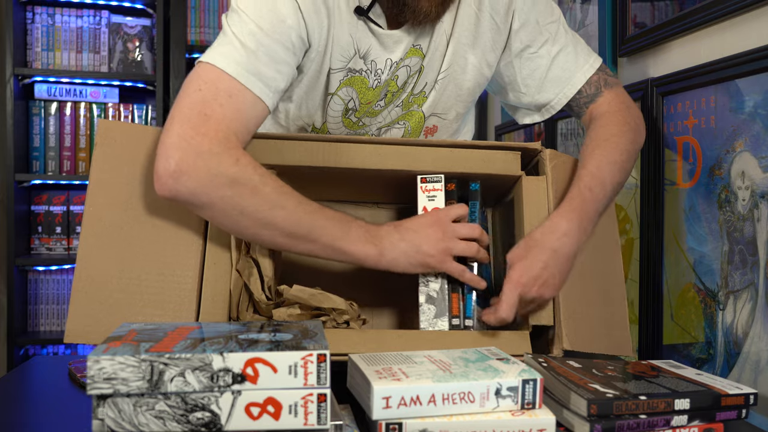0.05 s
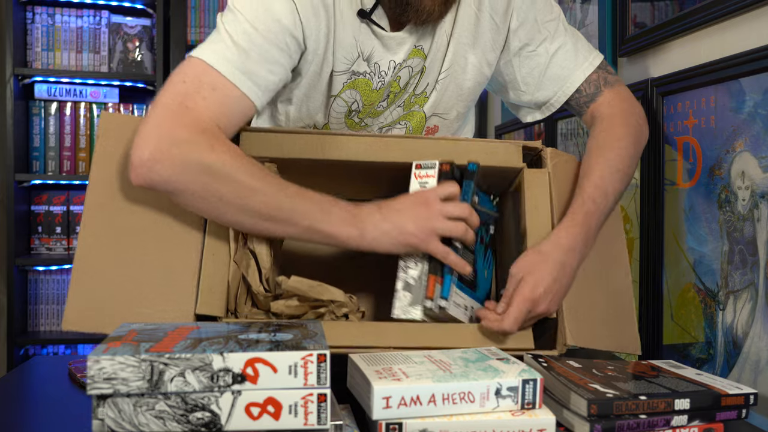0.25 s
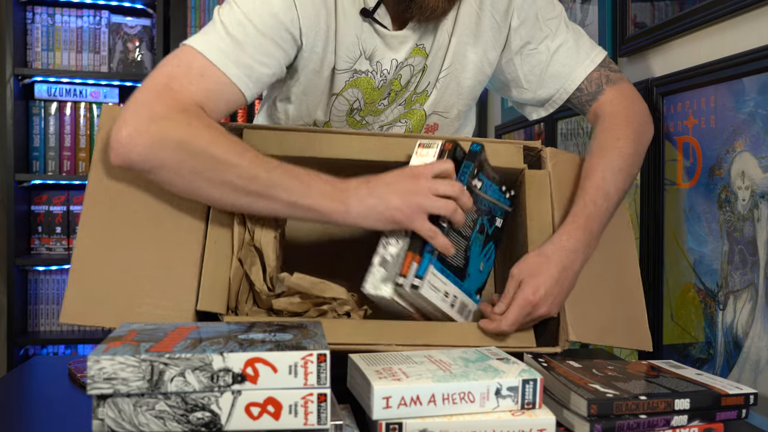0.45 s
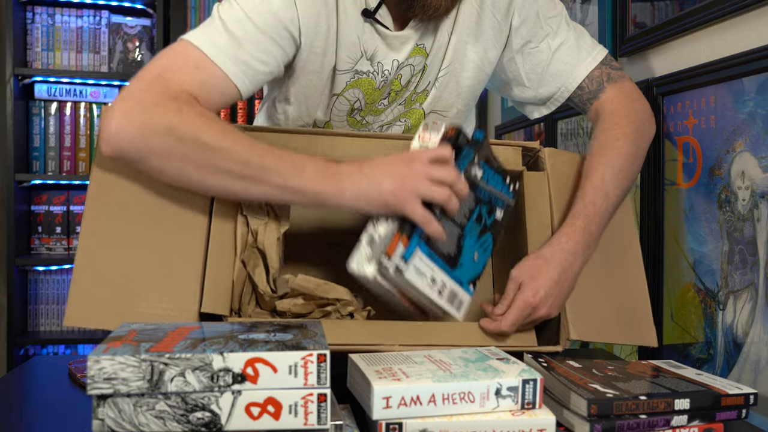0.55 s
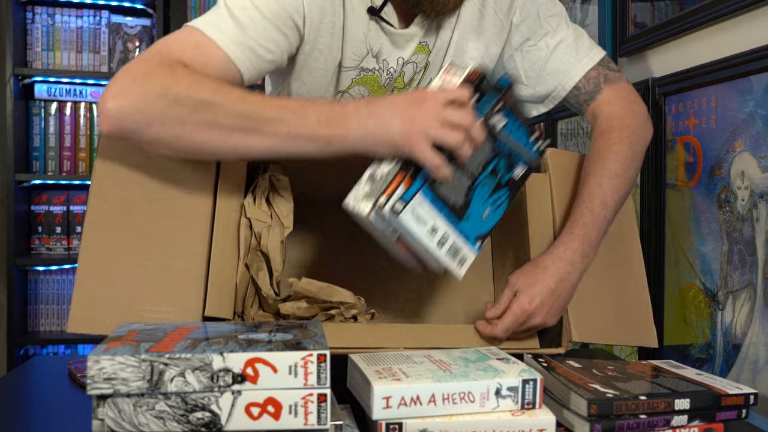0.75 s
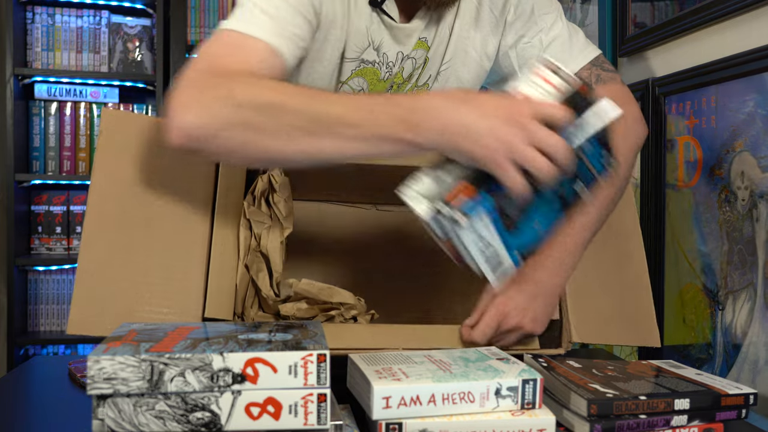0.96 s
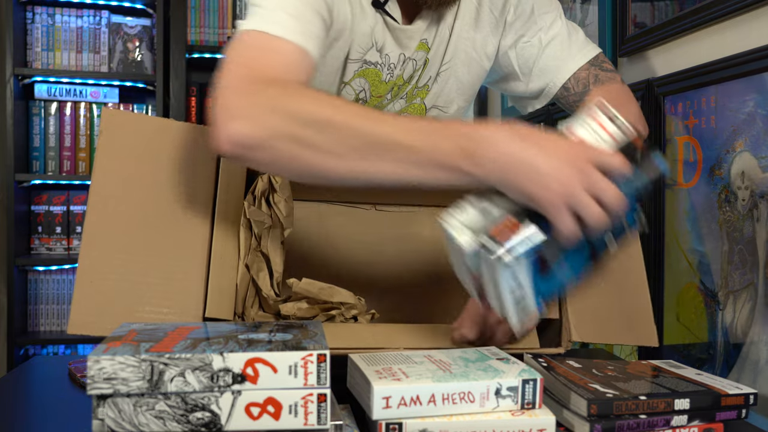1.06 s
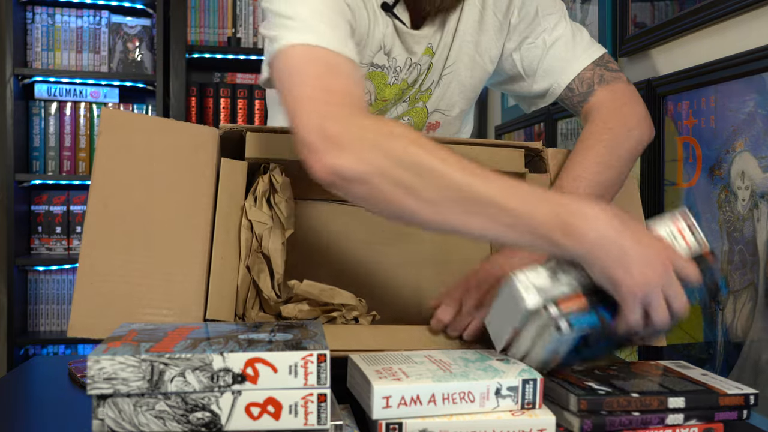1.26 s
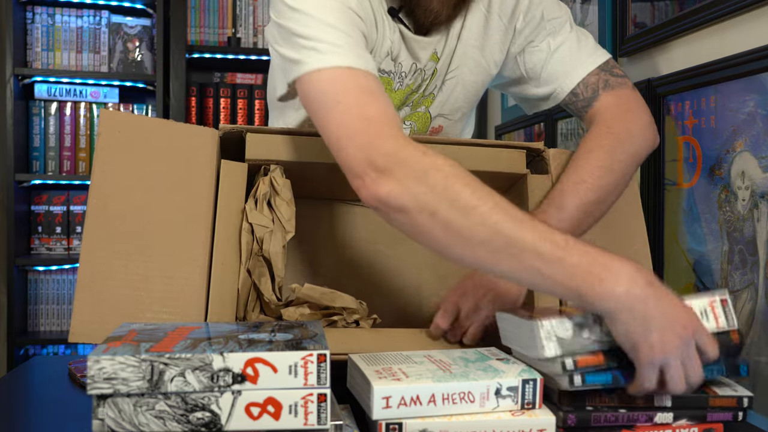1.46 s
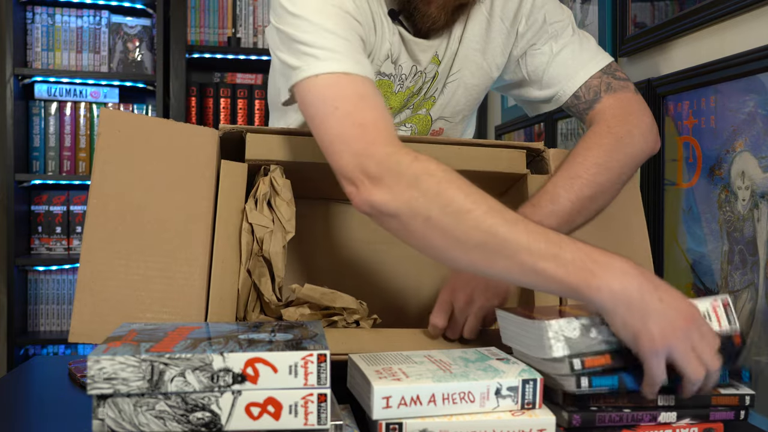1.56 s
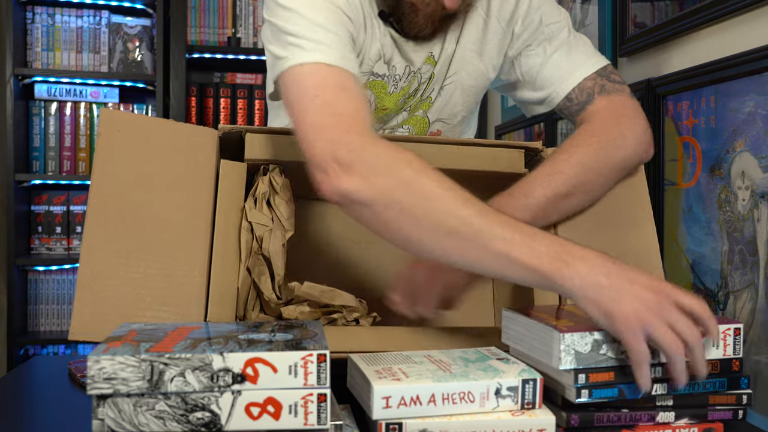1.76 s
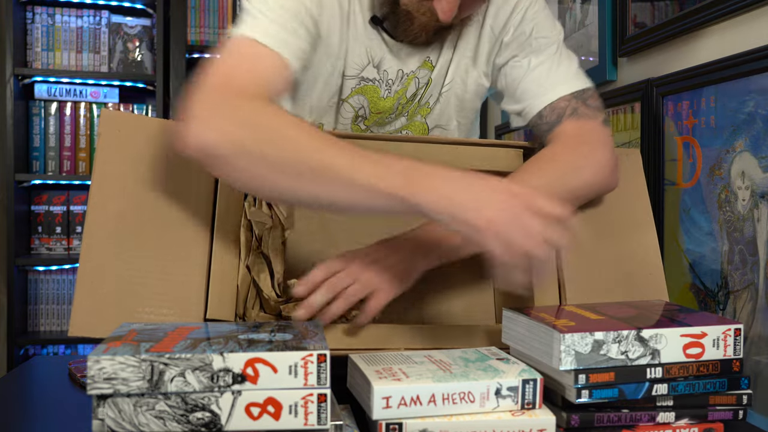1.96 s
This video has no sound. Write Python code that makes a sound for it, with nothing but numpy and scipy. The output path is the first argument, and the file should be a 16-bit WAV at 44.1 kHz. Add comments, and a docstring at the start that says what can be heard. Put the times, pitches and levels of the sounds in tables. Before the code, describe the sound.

Close up in a small, quiet room, books are dragged out of a cardboard box with a rasp and hollow knocks. After a light rustle, they settle on a pile with a bump and a dull thump.

```python
"""First comes a faint rustle and a soft bump, close by in a small, quietly rumbling room.
A handful of books is dragged out of a cardboard box: the covers hiss along the cardboard,
bump the wall and judder over the rim, which makes the box ring. Covers and sleeves rustle
as the books are carried to a pile on the table. They land with a soft bump, the tick of a
cover snapping flat and a dull thump. Rubbing is shaped noise; bumps set fading tones ringing."""
import sys
import numpy as np
from scipy import signal
from scipy.fft import rfft, irfft
from scipy.io import wavfile

SR = 44100
rng = np.random.default_rng(int(sys.argv[2]) if len(sys.argv) > 2 else 0)


def inscribe(sig):
    """Save sig as 16-bit PCM at rate SR to the path in sys.argv[1].

    A 1-D sig is mono; a 2-D sig holds one channel per row.
    Samples are clipped to [-1, 1] before scaling.
    """
    pcm = np.round(np.clip(np.atleast_2d(sig).T, -1, 1) * 32767)
    wavfile.write(sys.argv[1], SR, pcm.astype(np.int16))


N = 88200
TIME = np.arange(N) / SR

# the room's rumble; a "colour" says how strong each pitch is next to the others: f/Hz, level/dB
RUMBLE_COLOUR = [(22, -31), (52, 1.5), (75, -15), (110, 1.5), (200, -3), (320, -9.5), (1000, -16.5),
                 (3500, -27), (15500, -27)]
# stereo width, the side signal compared with the middle one: f/Hz, level/dB
STEREO_WIDTH = [(100, -23), (250, -20), (500, -9.5), (1000, -6), (2000, -4.5), (4000, -0.6), (12000, -2.5)]
# loudness of rustling cloth and covers: t/s, level/dB
RUSTLE_LEVEL = [(0, -64.5), (.70, -65), (.78, -58.5), (.85, -61.5), (.90, -60.5), (.97, -62.5),
                (1.01, -63.5), (1.07, -61.5), (1.10, -64), (1.15, -58), (1.21, -63), (1.27, -58),
                (1.36, -74.5), (1.46, -72.5), (1.63, -71.5), (1.72, -69.5), (1.78, -69), (1.90, -100)]
# colour of that rustle: f/Hz, level/dB
RUSTLE_COLOUR = [(70, -19), (170, 2.5), (520, 2), (750, -1.5), (2500, -3), (3300, -4.5), (4000, -9.5),
                 (5500, -13.5), (8000, -13.5), (15500, -23.5)]
# sleeve swishes; "fade" is the time to drop by 60 dB: t/s, level/dB, rise/s, fade/s
SLEEVE_SWISHES = [(.005, -71, 0.06, 0.17), (.962, -63, 0.22, 0.23), (1.016, -61, .02, 0.2),
                  (1.065, -67, 0.053, .25), (1.16, -68, 0.068, 0.57), (1.265, -65, 0.34, 0.32),
                  (1.40, -70.5, 0.041, .8), (1.71, -71, 0.21, 0.77)]
# colour of the sleeves: f/Hz, level/dB
SLEEVE_COLOUR = [(1500, -30), (2600, -1), (3350, 2.5), (4000, -1), (5000, 1.5), (5700, -3), (8000, 0),
                 (12000, -4), (15500, -7)]
# bumps against the box: t/s, level/dB, contact/ms
BOX_KNOCKS = [(.002, -58, 1.9), (.118, -50, 1.9), (.199, -46, 2.3), (.239, -56, 3.9), (.404, -50, 1.5),
              (.453, -39, 4.7), (.465, -46, 2.4), (.5635, -31.5, 2.53), (.5695, -32, 2.6), (.683, -35, 7.0),
              (.709, -38, 8.4), (.715, -33.5, 3), (.726, -39, 5.5), (.886, -56.5, 1.1)]
# tones the box rings with: f/Hz, level/dB, fade/s
BOX_TONES = [(99.6, -15, .22), (155, -7.5, 0.11), (181.4, -1, .11), (250, -5.5, 0.056), (332, -5, 0.068),
             (355.5, -7, 0.087), (395, -9, 0.082), (450, -11.5, 0.064), (526.7, -7.5, 0.17),
             (613, -12.5, 0.11), (658, -13, 0.057), (1046, -6.5, 0.039), (1160, -6.5, .04),
             (1670, -13, 0.022), (2405, -19, 0.032)]
# loudness of the judder as the books catch and slip on the rim: t/s, level/dB
JUDDER_LEVEL = [(.30, -100), (.42, -60.5), (.47, -54.5), (.51, -59), (.555, -49.5), (.595, -41),
                (.635, -48), (.67, -45), (.70, -46.5), (.722, -47.5), (.738, -59), (.79, -110)]
# brief rubs of cover on cover: t/s, level/dB, rise/s, fade/s
COVER_RUBS = [(0.032, -60, 0.0032, 0.079), (.888, -59, .025, 0.16), (1.236, -54, 0.03, 0.2),
              (1.315, -58, 0.033, 0.3), (1.509, -62, 0.066, 0.06), (1.533, -54.5, 0.016, 0.14),
              (1.684, -58, 0.035, 0.31), (1.99, -71, 0.27, .4)]
# colour of those rubs: f/Hz, level/dB
COVER_RUB_COLOUR = [(100, -43), (300, 5), (750, 4), (1050, -1.5), (1450, 2.5), (2500, -5.5), (3800, -11.5),
                    (9000, -18), (15500, -27)]
# the rasp on cardboard follows the pressure and speed of the slide: t/s, level/dB
RASP_LEVEL = [(.088, -100), (.099, -58), (.125, -56), (.16, -59.5), (.22, -54), (.29, -52), (.38, -51),
              (.46, -47.5), (.52, -50), (.555, -48.5), (.585, -45.5), (.64, -47), (.715, -48), (.74, -52.5),
              (.77, -69.5), (.86, -110)]
# colour of the rasp: f/Hz, level/dB
RASP_COLOUR = [(60, -33), (190, 2), (430, 0.5), (750, -1.5), (1250, -0.5), (2200, -1.5), (3250, -0.5),
               (3700, -8), (5800, -14.5), (8000, -15), (15500, -27)]
# the fine hiss of glossy covers follows the sliding speed: t/s, level/dB
GLOSS_LEVEL = [(.085, -100), (.115, -63), (.165, -63.5), (.21, -59.5), (.32, -57.5), (.46, -54), (.56, -56),
               (.63, -64), (.668, -55), (.695, -60), (.72, -57.5), (.79, -110)]
# colour of that hiss: f/Hz, level/dB
GLOSS_COLOUR = [(2500, -25), (4500, -3), (6000, -8), (7200, -1.5), (8300, -1.5), (9200, -6.5), (12000, -9),
                (15500, -18)]
# echoes off the walls of the box: left delay/ms, right delay/ms, level/dB
BOX_ECHOES = [(1.9, 1.92, -15.5), (3.7, 3.66, -13.5), (6.1, 6.14, -14.5), (9.4, 9.35, -13),
              (14.3, 14.35, -11)]
# loudness of a corner scuffing over the pile: t/s, level/dB
SCUFF_LEVEL = [(1.02, -100), (1.15, -62.5), (1.205, -67), (1.232, -54), (1.275, -58.5), (1.305, -55),
               (1.33, -57), (1.385, -110)]
# the books come down on the pile: t/s, level/dB, contact/ms
PILE_KNOCKS = [(1.2855, -42.5, 2.5), (1.2925, -37.5, 1.58), (1.305, -56.5, 1.3), (1.399, -53, 3.5),
               (1.467, -52, 2.1), (1.522, -51, 4.6), (1.559, -54, 8.1), (1.604, -57.5, 2.5),
               (1.6742, -33, 1.27), (1.680, -41.5, 1.6)]
# tones the pile rings with: f/Hz, level/dB, fade/s
PILE_TONES = [(52.3, -24, 0.53), (102.7, -7.5, 0.13), (130.5, -12.5, 0.14), (160.3, -6, 0.23),
              (217, -10, 0.095), (332.4, -1.5, 0.056), (405, -5, 0.073), (443, -6.5, 0.051),
              (579, -2, 0.032), (860, -11.5, 0.055)]
# a cover snaps flat: t/s, level/dB
COVER_SNAPS = [(1.5222, -42.5), (1.523, -50.5), (1.535, -69)]
# tones the cover rings with: f/Hz, level/dB, fade/s
COVER_TONES = [(1510, -7.5, 0.011), (2000, -3, 0.008), (2620, -3.5, 0.0023), (9700, -9.5, 0.0022),
               (14000, -10, .0015)]

BOX_LOW_HZ, PILE_LOW_HZ, COVER_LOW_HZ = 61, 62.3, 700   # below this each gives off little sound
ROOM_FADE_S, ROOM_DELAY_S = 0.26, 0.0035


def from_db(db):
    """Turn decibels into a number to multiply by."""
    return 10 ** (np.asarray(db) / 20)


def level(curve):
    """Loudness through time, joining the points of a table."""
    return from_db(np.interp(TIME, *np.transpose(curve)))


def strokes(rows):
    """Loudness of brief strokes: each gains its last 20 dB over the rise time, then dies away."""
    return sum(from_db(db - 20 * np.maximum(t - TIME, 0) / rise - 60 * np.maximum(TIME - t, 0) / fade)
               for t, db, rise, fade in rows)


def unit_level(x):
    """Scale a sound to an average strength (rms) of 1."""
    return x / np.sqrt(np.mean(x ** 2) + 1e-20)


def pan(x, db):
    """Make the left side louder than the right by db; below zero leans right."""
    return x * from_db(np.array([[db], [-db]]) / 2)


def high_pass(x, hz):
    """Remove the lows."""
    return signal.sosfilt(signal.butter(2, hz, "high", fs=SR, output="sos"), x)


def coloured(x, colour):
    """Turn each pitch of a sound up or down as a colour table says."""
    hz, db = np.transpose(colour)
    bin_hz = np.maximum(np.fft.rfftfreq(N, 1 / SR), 1)
    return irfft(rfft(x) * from_db(np.interp(np.log(bin_hz), np.log(hz), db)), N)


def stereo(middle, side):
    """Stereo from two unrelated signals: narrow in the bass, wide in the treble."""
    side = coloured(side, STEREO_WIDTH)
    return np.array([middle + side, middle - side])


def grains(per_s, uneven_db):
    """Countless tiny clicks of fibres catching; uneven_db varies their size."""
    sizes = from_db(uneven_db * np.minimum(rng.exponential(1, N), 5)) * rng.choice([-1, 1], N)
    return unit_level(sizes * (rng.random(N) < per_s / SR))


def friction(colour, per_s, uneven_db, pan_db):
    """The tiny clicks blur into a steady stereo rubbing noise."""
    clicks = stereo(grains(per_s, uneven_db), grains(per_s, uneven_db))
    return pan(unit_level(coloured(clicks, colour)), pan_db)


def pushes(rows):
    """A smooth push for each soft contact; the longer it lasts, the duller it sounds."""
    force = np.zeros(N)
    for t, db, ms in rows:
        push = np.sin(np.pi * np.clip((TIME - t) / (ms / 1000), 0, 1)) ** 2
        force += from_db(db) * push / (push.sum() + 1e-9)
    return force


def ring(force, tones, low_hz):
    """A force sets an object's fading tones ringing, neighbours in opposite directions."""
    out = np.zeros(N)
    for k, (hz, db, fade) in enumerate(tones):
        shrink, turn = from_db(-60 / (fade * SR)), 2 * np.pi * hz / SR   # per sample
        feedback = [1, -2 * shrink * np.cos(turn), shrink * shrink]
        out += (-1) ** k * from_db(db) * signal.lfilter([0, np.sin(turn)], feedback, force + 1e-18)
    return high_pass(out, low_hz)


def in_room(x, echo_db):
    """The sound itself plus a short wash of echoes from the room."""
    tail = stereo(*rng.standard_normal((2, N)))
    tail *= from_db(-60 * TIME / ROOM_FADE_S) * (TIME > ROOM_DELAY_S)
    tail /= np.sqrt(np.sum(tail ** 2) / 2)
    return x + from_db(echo_db) * signal.fftconvolve(x[None], tail, axes=1)[:, :N]


def in_box(x):
    """Quick echoes off the cardboard walls make a steady noise sound hollow."""
    out = x.copy()
    for left_ms, right_ms, db in BOX_ECHOES:
        for channel, ms in enumerate((left_ms, right_ms)):
            out[channel] += from_db(db) * np.roll(x[channel], int(ms * SR / 1000))
    return unit_level(out)


def room_rumble(db=-68.5):
    """A quiet, low noise fills the room throughout."""
    noise = stereo(*rng.standard_normal((2, N)))
    return from_db(db) * unit_level(coloured(noise, RUMBLE_COLOUR))


def rustle():
    """Covers rustle and sleeves swish as the arm moves."""
    covers = friction(RUSTLE_COLOUR, per_s=6000, uneven_db=1, pan_db=-1.5)
    sleeves = friction(SLEEVE_COLOUR, per_s=7600, uneven_db=2, pan_db=-4)
    return level(RUSTLE_LEVEL) * covers + strokes(SLEEVE_SWISHES) * sleeves


def box_bumps_and_judder(slips_per_s=160, jitter=0.3, uneven_db=1, grit=0.34):
    """Bumps on the wall and uneven, gritty slips on the rim make the box ring."""
    times = np.cumsum(np.exp(jitter * rng.standard_normal(800)) / slips_per_s)
    times = times[times < TIME[-1]]
    slips = np.zeros(N)
    slips[(times * SR).astype(int)] = from_db(uneven_db * rng.standard_normal(len(times)))
    drag = unit_level(slips) + grit * rng.standard_normal(N)
    drag = high_pass(drag, hz=254)   # slips are too light to stir the lowest tones much
    drag *= level(JUDDER_LEVEL) / np.std(ring(drag, BOX_TONES, BOX_LOW_HZ))
    ringing = ring(drag + pushes(BOX_KNOCKS), BOX_TONES, BOX_LOW_HZ)
    return pan(in_room(ringing, echo_db=-6), db=-0.3)


def cover_rubs():
    """Covers brush each other as the books shift and settle."""
    return strokes(COVER_RUBS) * friction(COVER_RUB_COLOUR, per_s=4500, uneven_db=2.5, pan_db=-3)


def slide():
    """Covers rasp and hiss along the cardboard inside the box."""
    rasp = in_box(friction(RASP_COLOUR, per_s=9000, uneven_db=0, pan_db=-2))
    hiss = in_box(friction(GLOSS_COLOUR, per_s=11000, uneven_db=1.5, pan_db=-3.5))
    return level(RASP_LEVEL) * rasp + level(GLOSS_LEVEL) * hiss


def landing():
    """One corner scuffs and bumps on the pile, then the books drop flat."""
    drag = high_pass(grains(per_s=2100, uneven_db=2), hz=170)   # too light to move the whole pile
    drag *= level(SCUFF_LEVEL) / np.std(ring(drag, PILE_TONES, PILE_LOW_HZ))
    ringing = ring(drag + pushes(PILE_KNOCKS), PILE_TONES, PILE_LOW_HZ)
    return pan(in_room(ringing, echo_db=-8), db=0.6)


def cover_tick():
    """A stiff cover snaps against its neighbour and rings very briefly."""
    force = np.zeros(N)
    for t, db in COVER_SNAPS:
        force[int(t * SR)] += from_db(db)
    ringing = ring(force, COVER_TONES, COVER_LOW_HZ)
    return pan(in_room(ringing, echo_db=-9), db=-13)


def scene():
    """All the handling of the books over the quiet rumble of the room."""
    return (room_rumble() + rustle() + box_bumps_and_judder() + cover_rubs()
            + slide() + landing() + cover_tick())


def record(dry, cutoff_hz=15720):
    """Cut away the very highest treble steeply."""
    return signal.sosfiltfilt(signal.ellip(10, .05, 50, cutoff_hz, fs=SR, output="sos"), dry)


dry = scene()
out = record(dry)
inscribe(out)
```